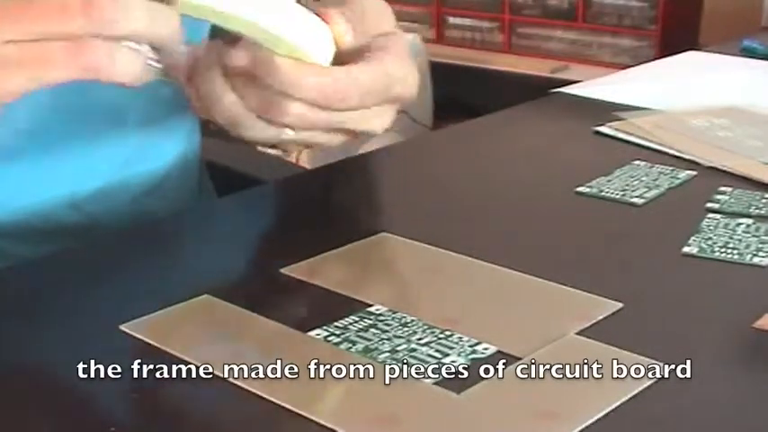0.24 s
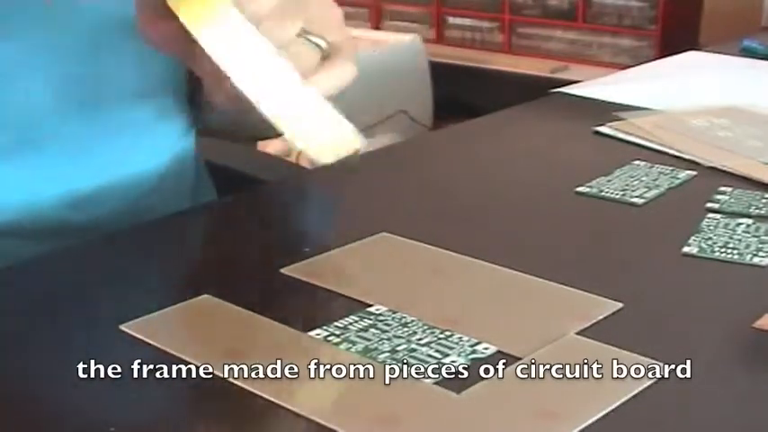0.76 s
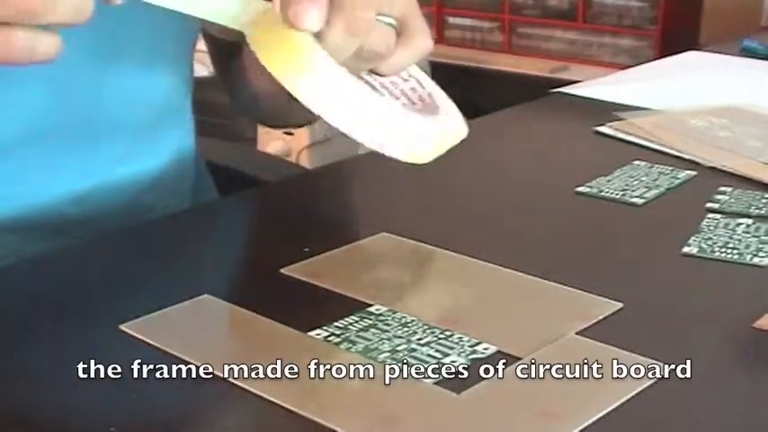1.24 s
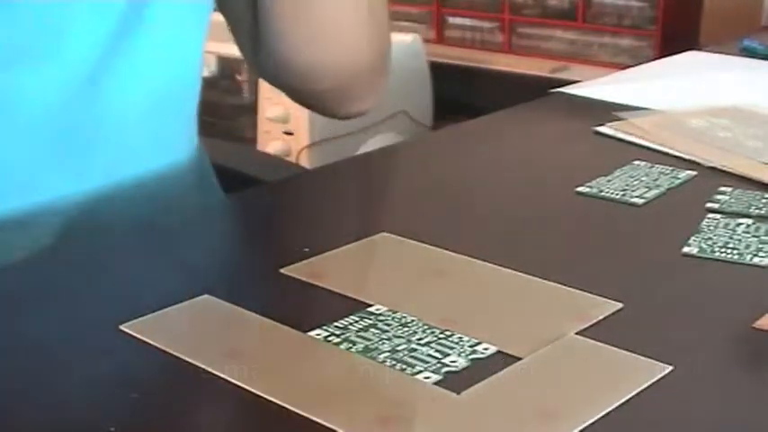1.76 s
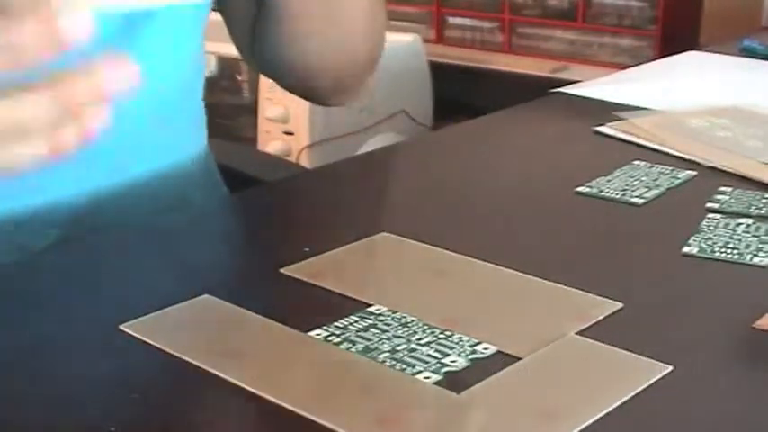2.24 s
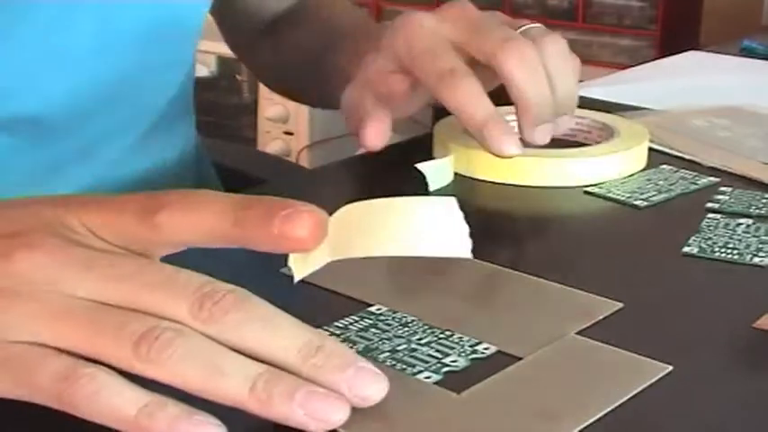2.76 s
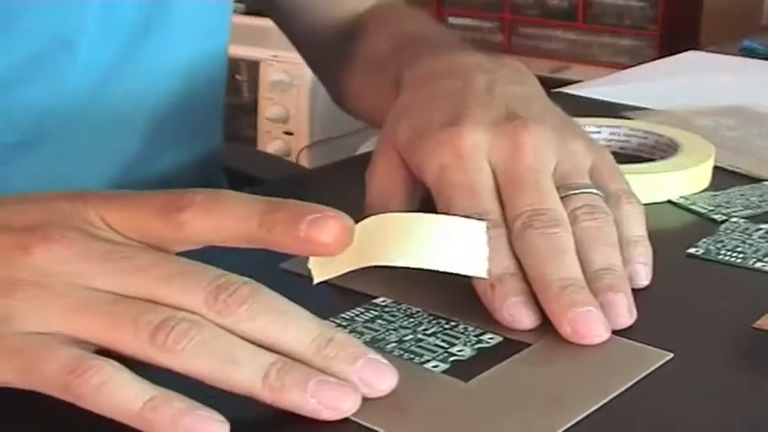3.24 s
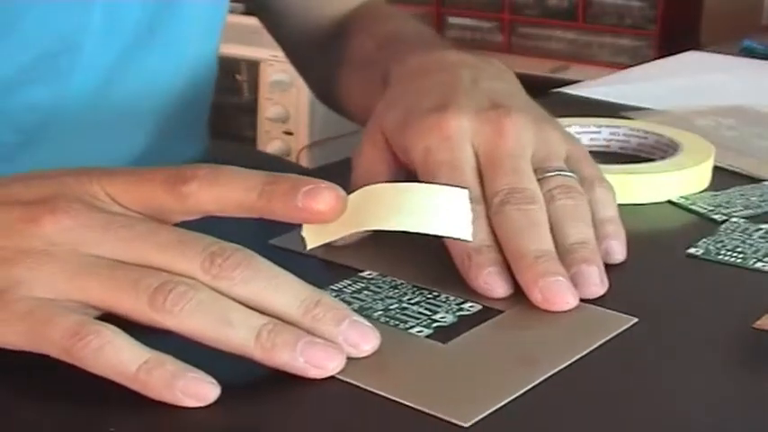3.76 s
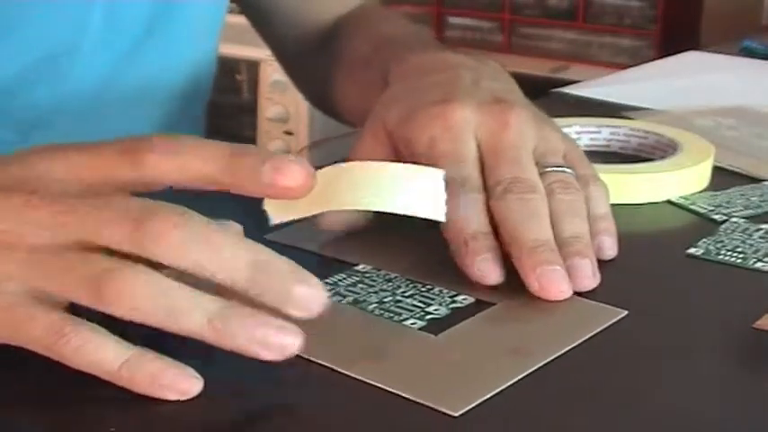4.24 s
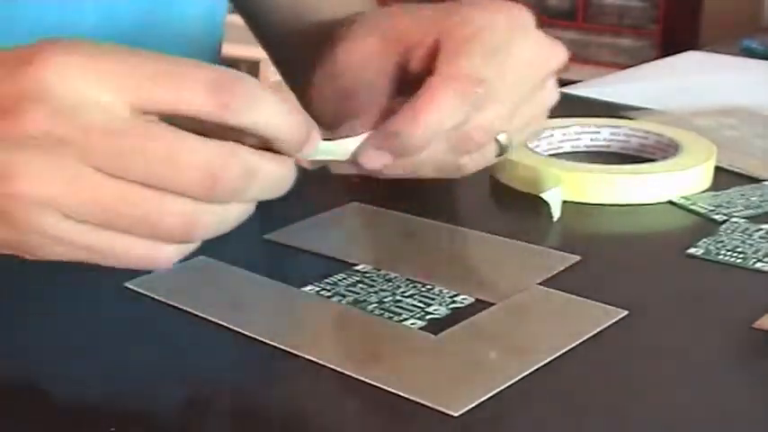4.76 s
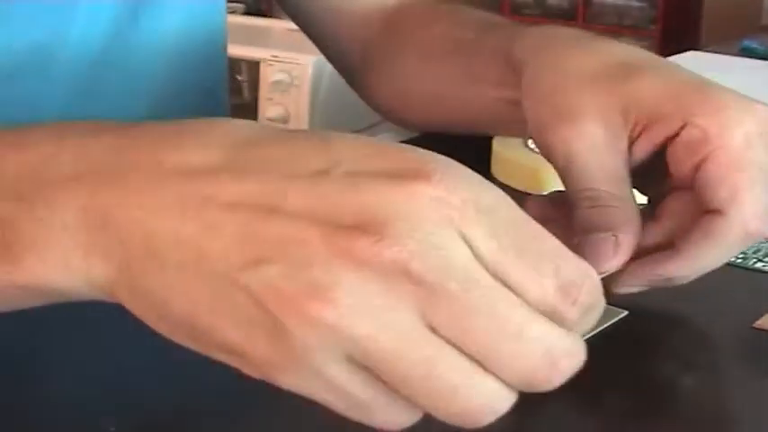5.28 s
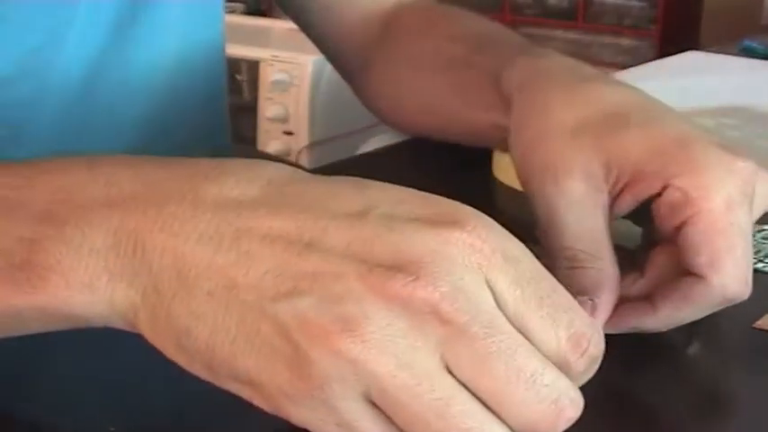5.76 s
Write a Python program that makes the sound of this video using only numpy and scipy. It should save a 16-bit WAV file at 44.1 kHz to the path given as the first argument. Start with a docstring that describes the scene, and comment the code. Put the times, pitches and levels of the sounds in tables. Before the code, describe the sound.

A close, slightly overloaded stereo microphone in a bare room with a bright echo of under a second; soft hiss and a barely audible electric hum throughout. From 0.1 to 0.7 s fingertips rub and crinkle tape faintly. At 0.73 s a short pull rasps, growing to a jerk by 0.9 s, with a whining pitch that falls steeply. A weaker pull at 1.27 s creeps slightly upward; a short hard one at 1.48 s dips, ending in sharp snaps near 1.57 s. Small crackles follow around 1.75 s. At 2.16 s the strip tears with a crisp snap and papery rip, finishing near 2.36 s. The cardboard roll knocks on the table at 2.58 s, thuds faintly, then lands harder at 2.79 s with a brief hollow chatter. Light board clicks come at 3.1 s. Near quiet follows, with faint rubbing at 3.7 s, tiny crinkles from 4.6 s and small sticky ticks at 5.03 and 5.3 s.

```python
"""In a bare, echoing room, masking tape is picked at, pulled off its roll in three short pulls and torn off.
Snapping glue threads excite the taut strip, whose pitch falls in the first and third pulls and creeps up in
the second; breaking paper fibres make the tear. The roll, a set of damped modes, is set down with two knocks
and a faint thud between. Clusters of tiny breaks make the fingers on thin boards and sticky strip.
Filtered noise gives the hiss, wavering sines the hum and whine, and decaying noise the echo."""
import sys
import numpy as np
from scipy import signal
from scipy.fft import rfft, irfft, next_fast_len
from scipy.io import wavfile
from scipy.ndimage import uniform_filter1d

SR = 44100
rng = np.random.default_rng(int(sys.argv[2]) if len(sys.argv) > 2 else 0)


def transcribe(signal):
    """Save signal, clipped to [-1, 1], as a 16-bit WAV file at the path in sys.argv[1]."""
    frames = np.atleast_2d(signal).T
    limited = np.clip(frames, -1, 1)
    pcm = np.round(limited * 32767).astype(np.int16)
    wavfile.write(sys.argv[1], SR, pcm)


N = 265173
T = np.arange(N) / SR


def amp(db):
    """Level law: decibels to amplitude gain."""
    return 10 ** (np.asarray(db) / 20)


def read(points, hz):
    """Logarithmic frequency scale: reads a table between its points."""
    f, value = np.transpose(points)
    return np.interp(np.log(hz + 1), np.log(f + 1), value)


def add(mix, s, sound):
    """Superposition: mixes a sound in at time s."""
    part = mix[..., round(s * SR):][..., :sound.shape[-1]]
    part += sound[..., :part.shape[-1]]


def stereo(mid, side):
    """Sum and difference: left and right from mid and side."""
    return np.array([mid + side, mid - side])


def wander(count, per_s):
    """Slow random modulation: straight lines between unit normal draws, per_s of them a second."""
    return np.interp(np.arange(count) * per_s / SR, np.arange(count), rng.standard_normal(count))


def colour(x, points, tilt_db=0, size=2048):
    """Minimum phase: a causal filter of unit energy with the given spectrum, tilted above the low mids."""
    hz = abs(np.fft.fftfreq(size, 1 / SR))
    log_gain = np.log(amp(read(points, hz) + tilt_db * np.log2(1 + hz / 900)))
    response = np.exp(signal.hilbert(log_gain).conj())
    taps = np.fft.ifft(response).real
    return signal.oaconvolve(x, taps / np.linalg.norm(taps))[:len(x)]


def resonate(x, hz, width):
    """Moving resonance: shifts the pitch to zero, damps, shifts back, and keeps the power of white noise."""
    turn = np.exp(2j * np.pi * np.cumsum(hz) / SR)
    r = np.exp(-np.pi * width / SR)
    swing = turn * signal.lfilter([1], [1, -r], x / turn + 1e-18)
    return np.sqrt(2 * (1 - r * r)) * swing.real


def snaps(count, per_s, spread_db, order=260):
    """Random impulse train: tiny breaks of uneven size, levelled to a nearly steady running power."""
    chance = rng.random(count)
    size = rng.exponential(1, count)
    push = rng.choice([-1., 1.], count)
    train = (chance < per_s / SR) * push * amp(spread_db * np.minimum(size, 4))
    return train / np.sqrt(abs(uniform_filter1d(train ** 2, order)) + 0.0089)


def burst(decay, per_s=9000, spread_db=3, count=4096):
    """Exponential decay: a dying cluster of breaks, with the energy of its envelope."""
    fade = np.exp(-np.arange(count) / SR / decay)
    x = snaps(count, per_s, spread_db) * fade
    return x * np.linalg.norm(fade) / (np.linalg.norm(x) + 1e-9)


def swells(rows, t):
    """Exponential growth and decay: the gain of efforts that build up to a peak and die away."""
    return sum(amp(db) * np.exp(-np.maximum((s - t) / rise, (t - s) / fall)) for s, db, rise, fall in rows)


def near(count=700):
    """Early scattering: direct sound and reflections off hands and table, different at each ear."""
    t = np.arange(count) / SR
    mid, side = rng.standard_normal((2, count)) * np.exp(-t / 0.0031)
    mid = signal.lfilter(*signal.butter(4, 2800, "high", fs=SR), mid)  # fingers only reflect short waves
    side = signal.lfilter(*signal.butter(3, 1500, "high", fs=SR), side)  # long waves reach both ears alike
    mid = mid / np.linalg.norm(mid)
    side = side / np.linalg.norm(side)
    direct = 0.8 * (t == 0)
    balance = amp([[.5], [-.5]])  # left slightly louder
    return stereo(direct + amp(-7) * mid, amp(-5.5) * side) * balance


def send(x, echo_db):
    """Direct and reverberant paths: rows of left and right as scattered just then, and the feed to the room."""
    return np.vstack([signal.oaconvolve(x[None], near(), axes=1)[:, :len(x)], amp(echo_db) * x])


# hiss spectrum before its overall level is set: frequency_hz, level_db
HISS = [(15, -36.5), (25, -4), (64, -17.5), (92, -2.5), (223, -4), (317, -6.5), (363, -6), (405, -2.5),
        (531, -7.5), (591, -3), (1560, -6), (2550, -12.5), (6210, -15), (6920, -18), (16000, -19)]
# stereo width of the hiss: frequency_hz, side_minus_mid_db
HISS_SIDE = [(60, 5), (110, 1), (200, 3), (380, 3.5), (700, -1.5), (1290, 6.5), (2380, -1.5), (4400, 1),
             (8120, -1), (15000, -19)]
# faint electric hum and whine, one row per frequency below: start_s, level_db
WHINE = [(1.5, -74), (-0.5, -70), (4.1, -73.5), (-18, -89)]
# hum and whine frequencies: frequency_hz
WHINE_HZ = [99, 1608, 6120, 7208]
HISS_DB = -58.5  # rms of the mid signal


def background():
    """Stationary noise: room air and microphone hiss, with an electric hum and whine of wavering phase."""
    size = next_fast_len(N)
    hz = np.fft.rfftfreq(size, 1 / SR)
    a, b = rfft(rng.standard_normal((2, size))) * amp(read(HISS, hz))
    mid, side = irfft(np.array([a, b * amp(read(HISS_SIDE, hz))]), size)[:, :N]
    whine = 0
    for f, (s, db) in zip(WHINE_HZ, WHINE):
        phase = 2 * np.pi * f * T + f / 2500 * wander(N, per_s=61)
        whine = whine + amp(db) * (T >= s) * np.sin(phase)
    return amp(HISS_DB) * stereo(mid, side) / np.std(mid) + whine


# strokes of fingertips on tape and board: peak_s, level_db, rise_s, fall_s
RUBS = [(.15, -58, .1, 0.12), (.335, -44.5, 0.033, 0.037), (.51, -55, .035, 0.012),
        (.705, -49.5, 0.074, .03), (3.66, -58, 0.1, 0.095), (4.935, -57.5, 0.069, 0.091),
        (5.016, -45, 0.0067, .012), (5.303, -52, .012, 0.016)]
# spectrum of rubbing skin: frequency_hz, level_db
SKIN = [(100, -11), (700, -13), (2000, -4.5), (4500, 0), (10000, 2), (15500, -1)]
# crinkles and snaps of the strip: start_s, level_db, decay_s, tilt_db_per_octave
CRINKLES = [(.273, -42, 0.0062, 2), (.523, -46, 0.0039, 1), (.7044, -38, 0.0014, 9),
            (0.732, -36, 0.0092, 5.5), (1.245, -43, 0.0046, -6), (1.252, -30, 0.0054, -3.5),
            (1.5175, -21.5, .0037, -2), (1.5687, -13.5, 0.0043, -0.5), (1.736, -30.5, 0.0036, -8.5),
            (1.745, -36, 0.0034, 2), (1.757, -31, 0.0057, 6), (1.77, -32, 0.0067, 8),
            (2.095, -42.5, 0.0038, -3.5), (2.114, -38.5, .0037, -15.5), (2.362, -21, 0.0035, -3.5),
            (4.636, -43, 0.0035, -10.5), (4.799, -46.5, 0.0063, -11.5), (4.82, -48.5, 0.0066, -1),
            (5.03, -29.5, 0.0047, -7.5), (5.315, -37.5, 0.0074, -7.5), (5.326, -29, 0.0074, -6),
            (5.38, -43.5, 0.012, -9.5)]
# spectrum of creased and tearing paper, also used by the tear: frequency_hz, level_db
PAPER = [(45, -21), (120, -28), (270, -28), (450, -12), (780, -8.5), (1060, -6), (1750, 1.5), (3500, -0.5),
         (7000, 4.5), (11000, 4), (15500, -3)]
# light taps of nails and boards: start_s, level_db, decay_s
TAPS = [(2.646, -36, 0.0033), (3.072, -26.5, 0.0022), (3.1001, -25, 0.0026), (3.11, -39.5, 0.0055),
        (3.137, -39, 0.013)]
# spectrum of a tapped board: frequency_hz, level_db
BOARD = [(200, -31), (900, -7), (2000, -6), (3500, -7.5), (6500, -8), (10000, -14), (15500, -18)]
CRINKLE_ECHO_DB = -10.5


def handling():
    """Friction and impact: fingers rub as a train of tiny slips, crinkle the strip and tap the boards."""
    slips = snaps(N, per_s=8000, spread_db=5.0) * swells(RUBS, T)
    out = send(colour(slips, SKIN), echo_db=-2.5)
    for s, db, decay, tilt_db in CRINKLES:
        add(out, s, send(amp(db) * colour(burst(decay), PAPER, tilt_db), CRINKLE_ECHO_DB))
    for s, db, decay in TAPS:
        add(out, s, send(amp(db) * colour(burst(decay), BOARD), echo_db=-4.5))
    return out


GRIP_S = 0.039  # the hand takes up the tension
TIGHTEN_DB_PER_S = 47.5  # the drag grows as the pull goes on
JERK_LEAD, LET_GO = 1.32, 0.78  # jerk peak, and start of letting go, in jerk half-widths before the end


def effort(t, length, drag_db, jerk_db, jerk_s):
    """Driving force: the hand grips, drags ever harder, adds a closing jerk and lets go."""
    drag = amp(drag_db + TIGHTEN_DB_PER_S * t) * np.minimum(t / GRIP_S, 1)
    jerk = amp(jerk_db) * np.exp(-((length - t) / jerk_s - JERK_LEAD) ** 2)
    return (drag + jerk) * np.clip((length - t) / (LET_GO * jerk_s), 0, 1)


SPEED_POWER = 1.3  # peeling speed goes with this power of the force
REACH_EASE = 3.37  # how early in the pull the strip nears its final pitch


def strip_pitch(force, from_hz, to_hz):
    """String law: period goes with free length, so it moves from first to last value as tape peels."""
    peeled = np.cumsum(force ** SPEED_POWER)
    reach = 1 - np.exp(-REACH_EASE * peeled / peeled[-1])
    return 1 / (1 / from_hz + (1 / to_hz - 1 / from_hz) * reach)


# pulls off the roll: start_s, length_s, drag_db, jerk_db, jerk_half_width_s, pitch_before_hz, pitch_after_hz,
# strip_ring_db, strip_damping_hz, tilt_db_per_octave, echo_db
PULLS = [(.728, 0.17, -37.5, -20.5, 0.029, 1970, 731, -3.5, 114, -0.5, -11.5),
         (1.267, .148, -35, -56, 0.026, 730, 782, -18, 152, 4.5, -11),
         (1.475, 0.0888, -31.5, -15.5, 0.0095, 540, 450, -17, 220, -.5, -8)]
# modes of the taut strip: pitch_multiple (ratio), damping_width_factor (ratio), level_db
STRIP = [(1, 0.61, 3), (2, 0.99, -16), (3, 1.8, -1), (5, 29, -11)]
# spectrum of snapping glue threads: frequency_hz, level_db
GLUE = [(45, -10.5), (70, -15.5), (120, -34), (270, -19), (430, -19), (760, 2), (1060, -14.5), (1550, 3.5),
        (2150, 4), (3700, 1.5), (6500, 5), (10000, 3), (15500, 0)]


def pull(start, length, drag_db, jerk_db, jerk_s, from_hz, to_hz, ring_db, width_hz, tilt_db, echo_db,
         count=13230, stutter_db=2.5, flutter=0.045):
    """Excited string: glue threads snap along the peel line in uneven runs and shake the taut strip."""
    force = effort(np.arange(count) / SR, length, drag_db, jerk_db, jerk_s)
    threads = snaps(count, per_s=5500, spread_db=2.5) * amp(stutter_db * wander(count, per_s=630))
    pitch = strip_pitch(force, from_hz, to_hz)
    # uneven tension shakes a short strip most
    pitch = pitch * np.exp(flutter * pitch / 700 * wander(count, per_s=430))
    no_bass = signal.butter(4, 340, "high", fs=SR, output="sos")  # a narrow strip radiates little bass
    strip = 0
    for k, wider, mode_db in STRIP:  # the modes move together with the strip's length
        swing = resonate(threads, k * pitch, wider * width_hz)
        swing = signal.sosfilt(no_bass, swing)
        power = abs(uniform_filter1d(swing ** 2, size=900))
        strip = strip + amp(mode_db) * swing / np.sqrt(power + .01)  # evened out: the pull sets the swing
    strip = signal.lfilter(*signal.iirnotch(1080, 3, fs=SR), strip)  # the table bounce cancels one band
    rasp = colour(force * threads, GLUE, tilt_db)
    return start, send(rasp + force * amp(ring_db) * strip, echo_db)


# runs of the tear across the paper: peak_s, level_db, rise_s, fall_s
TEAR = [(2.160, -13.5, 0.00092, 0.005), (2.178, -20, 0.0045, 0.0043), (2.2925, -32.5, .004, 0.0052),
        (2.357, -36, 0.026, 0.0041)]
NICK_S, NICK_DB = 2.1584, -14  # the edge of the tape gives with one snap and starts the tear


def tear(count=13230, strip_hz=790, strip_db=-17):
    """Fracture: the edge snaps, then paper fibres break in a few runs and shake the taut strip."""
    fibres = snaps(count, per_s=7800, spread_db=3.5) * swells(TEAR, NICK_S + np.arange(count) / SR)
    fibres = fibres + amp(NICK_DB) * burst(decay=0.0016, count=count)
    strip = signal.lfilter(*signal.iirpeak(strip_hz, 4, fs=SR), fibres) * np.sqrt(SR / strip_hz)
    return NICK_S, send(colour(fibres, PAPER) + amp(strip_db) * strip, echo_db=-12)


def ring(modes, t):
    """Modal synthesis: damped sines struck at t = 0; neighbours swing in opposite directions."""
    total = 0
    for k, (hz, db, t60) in enumerate(modes):
        total = total + (-1) ** k * amp(db - 60 * t / t60) * np.sin(2 * np.pi * hz * t)
    return total


# landings of the roll: start_s, level_db, softness_corner_hz, thud_db, rattle_db, echo_db
KNOCKS = [(2.579, -15.5, 1760, -15, -23.5, -8.5), (2.643, -43, 2030, 3, -19, -4),
          (2.794, -9, 2960, -18, -17, -3.5)]
# modes of the cardboard roll: frequency_hz, level_db, t60_s
ROLL = [(375, -16.5, 0.11), (450, -10, 0.056), (719, -4, 0.067), (787.4, -2, 0.068), (870, -3.5, .04),
        (923, -8.5, 0.074), (1185, -6, 0.053), (1336, -1, 0.045), (1640, -4, 0.021), (2183, -6, 0.055),
        (2440, -32, 0.027), (2920, 6.5, 0.0049), (3730, -18.5, 0.014)]
# modes of the table top: frequency_hz, level_db, t60_s
TABLE = [(96, 1, 0.088), (127.8, 5, 0.18), (168, 4.5, 0.065), (225, -7, 0.071)]
# spectrum of the contact: frequency_hz, level_db
CRACK = [(60, -18), (200, -4.5), (290, -7.5), (520, -7.5), (950, 3.5), (1500, -1.5), (3000, -11.5),
         (6000, -19.5), (10000, -29), (15500, -34)]


def knocks(count=17640, rattle_decay=0.081):
    """Impact: one edge of the roll lands, then it falls flat and chatters; the table top booms under it."""
    out, t = np.zeros((3, N)), np.arange(count) / SR
    roll, table = ring(ROLL, t), ring(TABLE, t)
    for s, db, soft_hz, thud_db, rattle_db, echo_db in KNOCKS:
        contact = amp(20.0) * (t == 0) + amp(3.0) * burst(decay=0.0025, count=count)
        contact = contact + amp(rattle_db) * burst(rattle_decay, per_s=1900, count=count)
        soften = signal.butter(1, min(soft_hz, SR / 3), fs=SR)
        blow = signal.lfilter(*soften, amp(1.0) * roll + colour(contact, CRACK))
        add(out, s, send(amp(db) * (blow + amp(thud_db) * table), echo_db))
    return out


# reverberation time of the room: frequency_hz, t60_s
ROOM_T60 = [(100, 0.89), (260, 0.53), (700, 0.74), (1840, 0.83), (4850, 0.74), (9000, 0.6), (15000, 0.31)]
# initial spectrum of the echo: frequency_hz, level_db
ROOM_COLOUR = [(50, -9), (110, 2), (300, 3), (800, 2), (2000, 0), (6000, 1.5), (10000, 0.5), (15000, 5.5)]
# long waves reach both ears more alike: frequency_hz, side_minus_mid_db
ROOM_SIDE = [(120, -10), (500, -12), (1100, -5.5), (4000, -4)]


def tail(count=44100):
    """Diffuse decay: dense reflections swell as the far walls answer, each band dying at its own speed."""
    hz, t, z = signal.stft(rng.standard_normal((2, count)), SR, nperseg=256)
    swell_db = np.interp(t, [0, .012, .04, .056, .085], [-29.0, -2.0, -6, -0.5, -2.5])
    decay_db = -60 * t / read(ROOM_T60, hz)[:, None]
    z = z * amp(swell_db + read(ROOM_COLOUR, hz)[:, None] + decay_db)
    bands = np.array([z[0], z[1] * amp(read(ROOM_SIDE, hz))[:, None]])
    mid, side = signal.istft(bands, SR, nperseg=256)[1]
    return amp(-1.5) * stereo(mid, side) / np.linalg.norm(mid)


def room(sources):
    """Convolution: near sound plus the long answer of the room."""
    left, right, echo = sources
    return np.array([left, right]) + signal.fftconvolve(echo[None], tail(), axes=1)[:, :N]


def scene():
    """Superposition: all sources, near and through the room, over the background."""
    sources = handling() + knocks()
    for row in PULLS:
        add(sources, *pull(*row))
    add(sources, *tear())
    return room(sources) + background()


LOPSIDED_DB = -19  # the microphone bends loud treble unevenly, which adds a low puff
EDGE_HZ = 16100  # upper band limit


def record(dry):
    """Nonlinear distortion: loud treble overloads the microphone, high peaks round off, the band is limited."""
    treble = signal.lfilter(*signal.butter(2, 3000, "high", fs=SR), dry)
    puff = signal.lfilter(*signal.butter(1, [30, 200], "band", fs=SR), treble ** 2)
    bent = dry + amp(LOPSIDED_DB) * puff
    bent = signal.lfilter(*signal.butter(2, 32, "high", fs=SR), bent)  # the microphone misses the deepest bass
    rounded = bent / (1 + (bent / .9) ** 4) ** .25
    band_limit = signal.firwin(401, EDGE_HZ, window=("kaiser", 9), fs=SR)
    return signal.oaconvolve(rounded, band_limit[None], "same")


dry = scene()
out = record(dry)
transcribe(out)
```